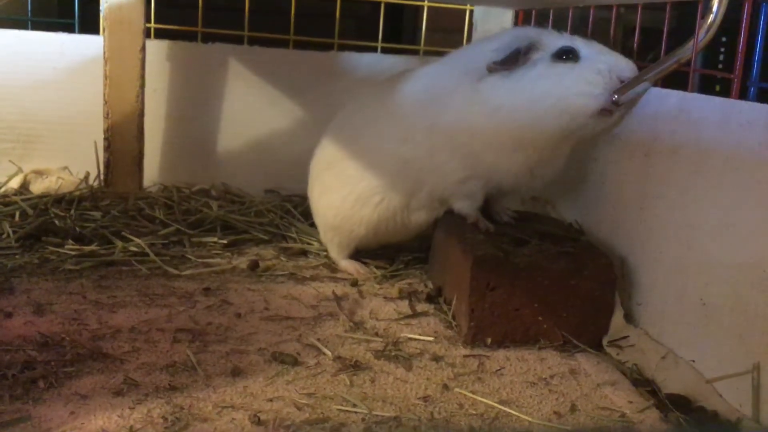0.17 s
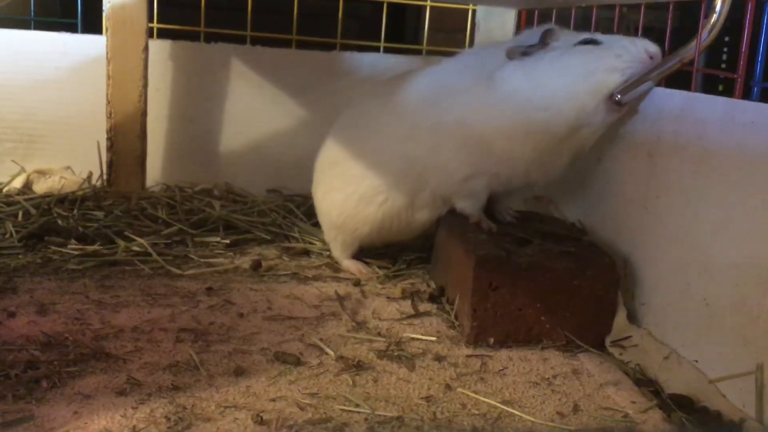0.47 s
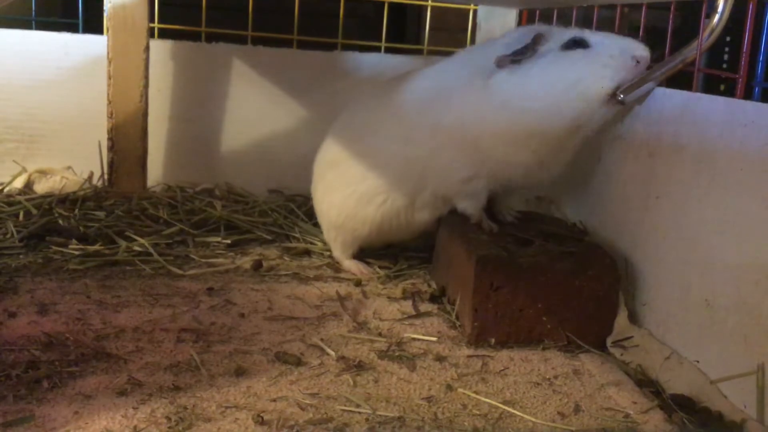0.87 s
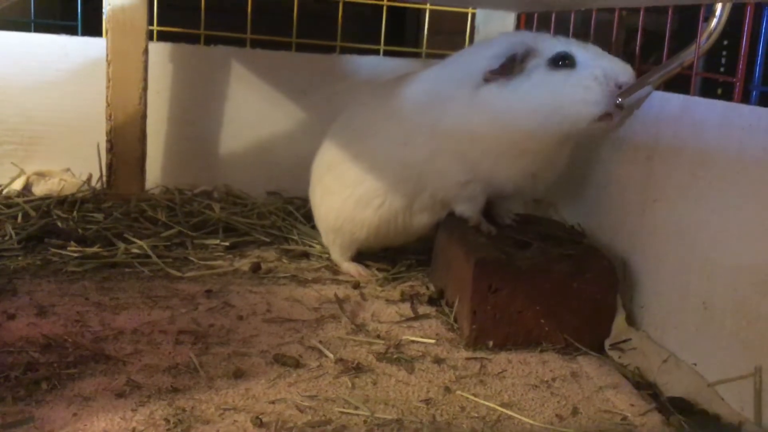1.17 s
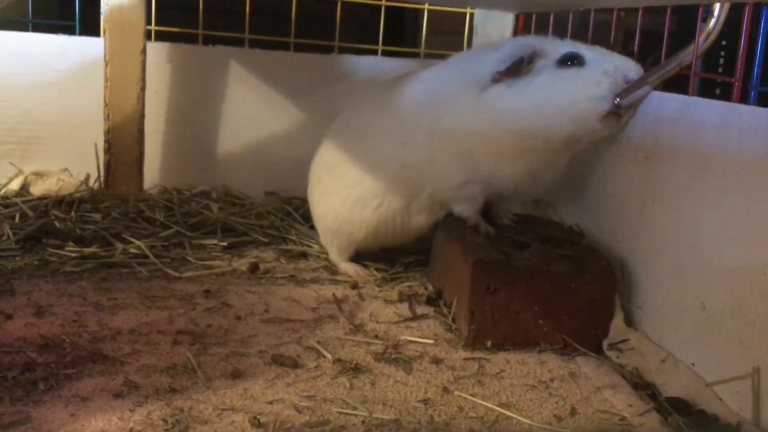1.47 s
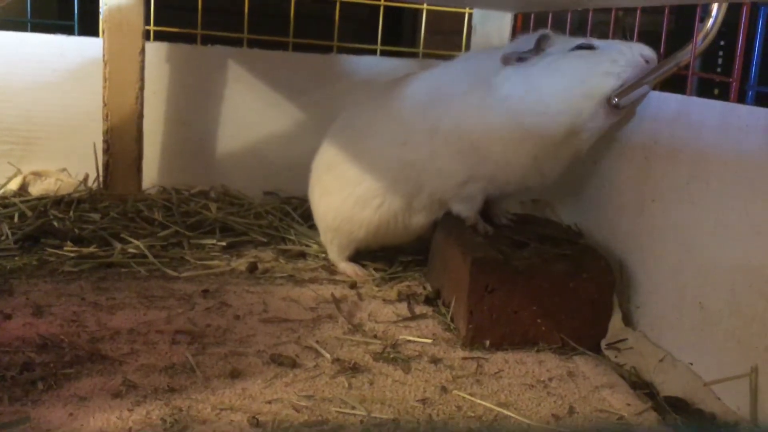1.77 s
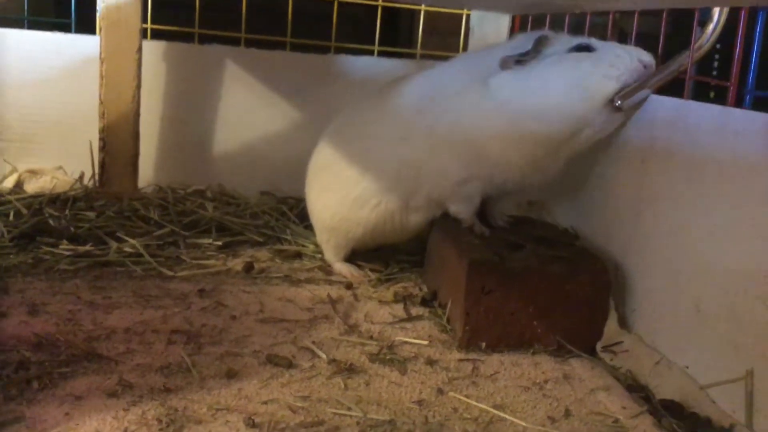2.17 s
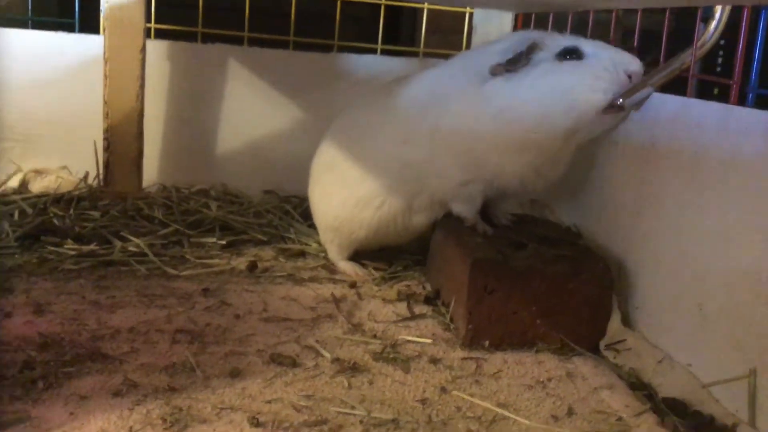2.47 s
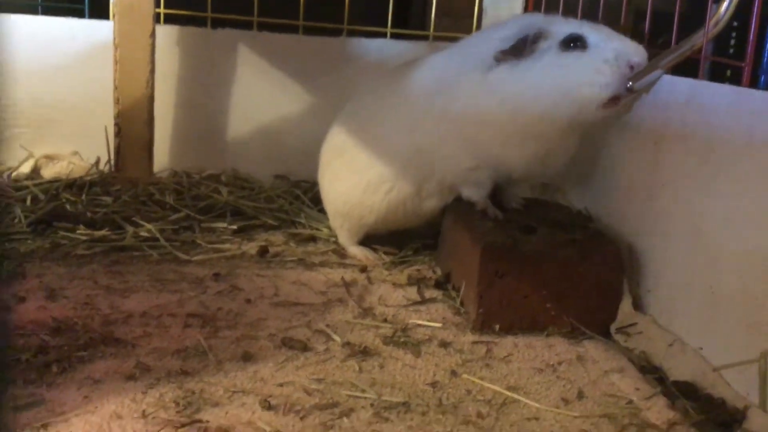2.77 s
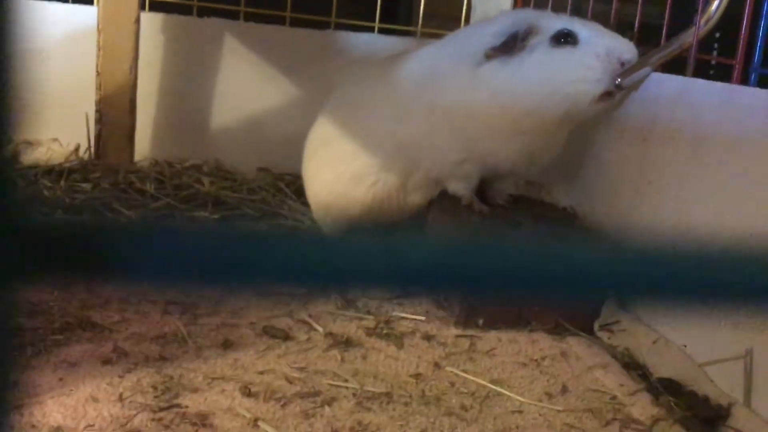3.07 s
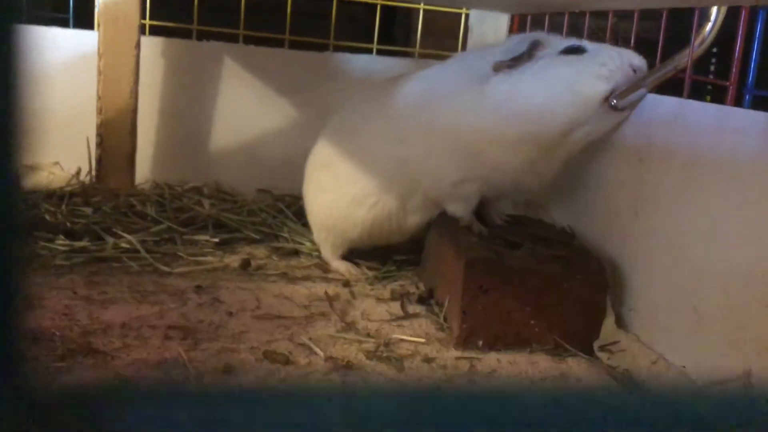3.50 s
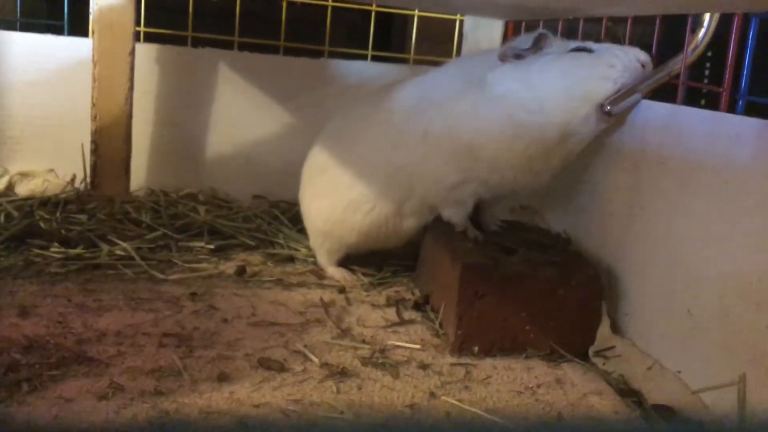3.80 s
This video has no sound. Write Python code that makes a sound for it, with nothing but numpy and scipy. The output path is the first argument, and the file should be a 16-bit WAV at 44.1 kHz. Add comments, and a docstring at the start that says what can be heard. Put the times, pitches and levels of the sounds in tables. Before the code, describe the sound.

A guinea pig drinks at a metal spout, with scattered clicks, soft thuds and a few rattling bumps over room hum and a thin sizzle. Late on, a knock close to the microphone rings the pen's panels and bars.

```python
"""A quiet room hums, with a thin high sizzle behind it, while a guinea pig drinks from a bottle.
The steel spout jolts twice, and again at the very end: each impact rattles it and bumps the bottle
against the pen. Between come small clicks, brief rustles and dull thuds as the animal shifts.
Late on, something knocks the pen near the microphone; its panels and wire bars ring in damped modes."""
import sys
import numpy as np
from scipy import signal
from scipy.fft import rfft, irfft, next_fast_len
from scipy.io import wavfile
from scipy.ndimage import map_coordinates

SR = 44100
rng = np.random.default_rng(int(sys.argv[2]) if len(sys.argv) > 2 else 0)


def store_pcm(level_fs):
    """Save levels as 16-bit WAV."""
    pcm = np.round(np.clip(level_fs, -1, 1) * 32767).astype(np.int16)
    wavfile.write(sys.argv[1], SR, np.atleast_2d(pcm).T)


N = 173754
TIME = np.arange(N) / SR
RING_TIME = TIME[:int(.7 * SR)]
KNOCK_S = 3.1775

# Room noise. Each row: frequency in Hz, relative spectral density in dB.
ROOM_SPECTRUM = [(20, -61), (30, -40), (38, -19), (52, 0.5), (90, 2.5), (150, -4.5), (200, -2.5),
                 (270, -9.5), (350, -11.5), (480, -18.5), (590, -13.5), (780, -15), (900, -22.5),
                 (1500, -26.5), (2000, -29.5), (2500, -35.5), (4000, -40.5), (7000, -51.5), (7850, -57),
                 (8200, -51), (8700, -52.5), (9600, -52), (10300, -55), (12000, -56), (15500, -53)]
# Slow swells of the room noise. Each row: time in seconds, rumble gain in dB, air gain in dB.
ROOM_SWELLS = [(0, -1, -0.5), (.5, -0.5, 1.1), (.86, 4, 1), (1.2, -3, 0), (1.6, 0, 0), (2.05, 4, 0.5),
               (2.55, -1, -1), (2.8, 3.5, -0.5), (3.1, 1, 0), (3.5, 0, -1), (3.94, 2, -0.5)]
# Motor hum. Each row: frequency in Hz, rms level in dB.
HUM_PARTIALS = [(58, -60.5), (118.6, -59.5), (236.6, -63), (295, -67.5), (529, -76), (647, -72), (969, -87),
                (1082, -85), (3181, -92), (9000, -105)]
# Resonances of the sizzle. Each row: centre in Hz, width in Hz, relative level in dB.
SIZZLE_RESONANCES = [(2280, 1000, -10.5), (3133, 620, -3), (5077, 430, -0.5), (5565, 990, -9.5)]
# Course of the sizzle. Each row: time in seconds, then hiss, high whistle and low whistle levels in dB.
SIZZLE_LEVELS = [(0, -74.5, -75.5, -87), (.5, -76, -85.5, -88), (.9, -74.5, -82.5, -85.5),
                 (1.25, -70.5, -80, -80), (1.5, -72, -86, -85), (1.7, -71.5, -83, -81),
                 (2.03, -70, -82, -83), (2.25, -72, -91, -88), (2.7, -71.5, -96, -95),
                 (2.95, -81.5, -100, -97), (3.35, -80, -100, -92), (3.65, -78.5, -98, -89),
                 (3.94, -80.5, -100, -93)]
# The lower whistles in the sizzle. Each entry: frequency in Hz.
LOW_WHISTLE_PITCHES = [4985, 5076]
# Rustles. Each row: centre and half length in seconds, level in dB, band centre and width in Hz.
RUSTLE_SWELLS = [(2.078, 0.013, -67, 2800, 3600), (2.793, 0.009, -67, 3870, 2000),
                 (2.786, 0.022, -82, 12000, 9050), (2.89, 0.12, -81, 6300, 1800),
                 (2.97, 0.024, -79, 10100, 10800), (2.971, 0.18, -77, 3880, 1210)]
# The animal shifting. Each row: start in seconds, level in dB.
FLOOR_BLOWS = [(0.844, -46), (1.634, -48.5), (2.102, -47), (2.775, -45.5), (2.853, -43)]
# The pen floor. Each row: frequency in Hz, relative level in dB, t60 in seconds.
FLOOR_MODES = [(62, 1, 0.14), (119, 5, 0.13), (171.4, -0.5, .1)]
# The knock and its rebounds. Each row: start in seconds, clatter level in dB.
KNOCK_CONTACTS = [(3.1775, -47), (3.187, -52), (3.202, -56.5), (3.223, -62)]
# Clatter of the knock. Each row: frequency in Hz, relative spectral density in dB, t60 in seconds.
CLATTER_SPECTRUM = [(100, -5, .38), (300, -3, 0.26), (600, -6.5, 0.25), (1090, -11, 0.22),
                    (2000, -20.5, .19), (2970, -24, 0.14), (3630, -17.5, 0.17), (5680, -23.5, 0.3),
                    (6460, -33, 0.13), (10000, -37, 0.17), (15500, -45, 0.15)]
# The pen's panels. Each row: frequency in Hz, relative level in dB, t60 in seconds.
PANEL_MODES = [(120.3, -0.5, 0.59), (166, 2.5, 0.48), (286, 1.5, 0.27), (322, -0.5, 0.23), (393, -8, 0.45),
               (533.7, -11, 0.51), (612, -3, 0.29), (646, -8, 0.33), (843, -6.5, 0.31), (1090, -25, 0.25),
               (1135, -19, 0.27), (1207, -20.5, 0.53), (1707, -15.5, 0.27), (2104, -27, 0.21),
               (2715, -23.5, 0.37)]
# The wire bars. Each row: frequency in Hz, level in dB, t60 and build-up time in seconds.
BAR_MODES = [(3513, -65, 0.36, .003), (3560, -68, 0.72, .003), (3670, -62, .6, 0.0087),
             (3770, -66.5, .3, .003), (4100, -72, .35, .003), (4242, -70, 0.42, .003),
             (4360, -75, 0.75, .003), (4540, -78, 0.61, .003), (4893, -73, 0.31, .003),
             (5351, -75, .4, .003), (5626, -63, .38, .08), (5680, -61, .38, .08), (5640, -56, .39, .1)]
# Clicks. Each row: start in seconds, peak in dB, band centre and width in Hz, t60 in seconds.
CLICK_BURSTS = [(.548, -62.5, 10000, 7500, 0.011), (.6975, -55.5, 1790, 800, .01),
                (.7035, -57, 5200, 700, .012), (.704, -70, 10000, 12000, .006),
                (0.7105, -57.5, 6000, 1000, 0.009), (0.7145, -59, 6300, 2500, 0.004),
                (.715, -70, 12000, 8000, 0.0064), (0.716, -67, 8300, 1000, 0.011),
                (2.075, -65, 9000, 12000, 0.0045), (2.076, -49, 5140, 900, 0.0076),
                (2.087, -56, 5300, 1200, .009), (2.462, -53.5, 3380, 1000, 0.0066),
                (2.592, -63.5, 7150, 4000, 0.0051), (2.652, -50.5, 3800, 2300, 0.0089),
                (2.668, -55, 4160, 2300, .008), (2.7616, -55, 3300, 3000, 0.0059),
                (2.7755, -56, 3800, 7000, 0.0018), (2.8555, -56, 4400, 3800, 0.007),
                (2.889, -67, 9000, 9000, .002), (2.9585, -66, 9000, 11000, .003),
                (2.9735, -62, 9000, 12000, .003), (3.003, -58, 3500, 3000, 0.0066),
                (3.1835, -60, 10000, 10000, .003), (3.196, -64, 10000, 10000, .003),
                (3.2333, -63.5, 11000, 7000, 0.0045), (3.779, -67, 8700, 1590, 0.0065)]
# Sharp snaps. Each row: start in seconds, level in dB.
SNAP_ONSETS = [(2.729, -33.5), (3.1774, -45)]
# Modes of a snap. Each row: frequency in Hz, relative level in dB, t60 in seconds.
SNAP_RESONANCES = [(1050, -5.5, 0.0035), (1840, -4, 0.0024), (2790, -0.5, 0.0037), (4320, -6.5, 0.0028),
                   (7900, -20, 0.00067)]
# Jolts of the bottle. Each row: start in seconds, thump and rattle levels in dB, rattle t60 in seconds.
BOTTLE_JOLTS = [(.696, -42, -60, 0.12), (.712, -47.5, -62.5, 0.18), (2.0745, -45, -55, .06),
                (2.086, -39.5, -59, 0.15), (3.925, -48, -66.5, .15)]
# Bottle and pen wall together. Each row: frequency in Hz, relative level in dB, t60 in seconds.
BOTTLE_MODES = [(129.7, -4, 0.38), (233.1, 4.5, 0.22), (272, -9, 0.042), (327, -4.5, 0.065),
                (529, -17.5, 0.32), (568, -20, 0.18), (767, -20.5, 0.57), (3806, -38, 0.3)]
# Rattle of the spout. Each row: frequency in Hz, relative spectral density in dB.
SPOUT_SPECTRUM = [(400, -16), (700, -6), (1000, -1), (1400, 3.5), (1750, 10), (2500, -3), (3550, -2.5),
                  (3820, -20), (4250, -7), (5170, 5.5), (5700, -4.5), (7000, -13), (9000, -13),
                  (11000, -37), (15500, -18)]


def amp(db):
    """Amplitude ratio of a level in decibels."""
    return 10 ** (np.asarray(db) / 20)


def unit(x):
    """Normalisation to rms 1."""
    return x / np.sqrt(np.mean(x ** 2) + 1e-20)


def along(points, hz):
    """Interpolation of (Hz, value) points on a log frequency axis."""
    f, values = np.transpose(points)
    return np.interp(np.log(hz + 1), np.log(f + 1), values)


def curves(rows):
    """Linear interpolation in time of each column after the first."""
    times, *columns = np.transpose(rows)
    return [np.interp(TIME, times, column) for column in columns]


def wobble(rate):
    """Smooth random modulation with rate knots a second."""
    return map_coordinates(rng.standard_normal(int(N * rate / SR) + 4), [TIME * rate])


def filtered(x, response):
    """Linear filtering: the spectrum of x times a frequency response."""
    size = next_fast_len(len(x) + 8192)
    return irfft(rfft(x, size) * response(np.fft.rfftfreq(size, 1 / SR)), size)[:len(x)]


def resonance(f, hz, width_hz):
    """Gain of two equal resonators in cascade."""
    return (f * width_hz) ** 2 / ((hz * hz - f * f) ** 2 + (f * width_hz) ** 2)


def passband(f, hz, width_hz):
    """Gain of a flat-topped band-pass filter."""
    return 1 / (1 + ((f * f - hz * hz) / (f * width_hz + 1)) ** 4)


def noise(response, size=N):
    """White noise coloured by a filter, at rms 1."""
    return unit(filtered(rng.standard_normal(size), response))


def fade(t, t60):
    """Exponential damping: 60 dB down after t60 seconds."""
    return np.exp(-np.log(1000) * t / t60)


def rise(t, attack_s):
    """Exponential approach to full amplitude."""
    return 1 - np.exp(-t / attack_s)


def ring(modes, attack_s):
    """Free vibration after a blow: a sum of damped sinusoids."""
    t = RING_TIME
    tones = sum(amp(db) * fade(t, t60) * np.sin(2 * np.pi * hz * t) for hz, db, t60 in modes)
    return tones * rise(t, attack_s)


def add(track, start_s, sound):
    """Superposition of a sound on the track."""
    part = track[round(start_s * SR):][:len(sound)]
    part += sound[:len(part)]


def wavering_tone(hz, waver_db, waver_rate, drift_rad, drift_rate):
    """Random amplitude and phase modulation of a sinusoid, at about rms 1."""
    gain = amp(waver_db * wobble(waver_rate))
    return gain * np.sqrt(2) * np.sin(2 * np.pi * hz * TIME + drift_rad * wobble(drift_rate))


def room():
    """Broadband air noise and rumble swell slowly under the line spectrum of a motor."""
    air = amp(-52) * noise(lambda f: amp(along(ROOM_SPECTRUM, f)))
    rumble = filtered(air, lambda f: 1 / (1 + (f / 141) ** 4))  # below 141 Hz
    rumble_db, air_db = curves(ROOM_SWELLS)
    hum = sum(amp(db) * wavering_tone(hz, waver_db=2.5, waver_rate=3.906, drift_rad=.66, drift_rate=5.004)
              for hz, db in HUM_PARTIALS)
    return amp(air_db) * (air - rumble) + amp(rumble_db) * rumble + hum


def whistle(hz):
    """Modulation spreads a pure tone into a thin, unsteady whistle."""
    return wavering_tone(hz, waver_db=2.8, waver_rate=12, drift_rad=1.3, drift_rate=40)


def sizzle():
    """Resonances colour a faint, fluttering hiss, in which whistles come and go."""
    hiss_db, high_db, low_db = curves(SIZZLE_LEVELS)
    hiss = noise(lambda f: sum(amp(db) * resonance(f, hz, width) for hz, width, db in SIZZLE_RESONANCES))
    high = amp(high_db) * whistle(hz=5179)
    low = amp(low_db) * sum(whistle(hz) for hz in LOW_WHISTLE_PITCHES)
    flutter_db = .9 * wobble(60)
    return amp(hiss_db + flutter_db) * hiss + high + low


def rustles():
    """Fast amplitude modulation makes band noise grainy; a Gaussian envelope swells and fades it."""
    out = np.zeros(N)
    for centre_s, half_s, db, hz, width in RUSTLE_SWELLS:
        hiss = noise(lambda f: passband(f, hz, width))
        grain_db = 3.5 * wobble(600)
        out += amp(db) * unit(hiss * amp(grain_db)) * np.exp(-((TIME - centre_s) / half_s) ** 2)
    return out


def thuds():
    """Soft impacts of the shifting animal excite the low modes of the floor."""
    out = np.zeros(N)
    for start_s, db in FLOOR_BLOWS:
        add(out, start_s, amp(db) * ring(FLOOR_MODES, attack_s=.0018))
    return out


def knock():
    """An impact excites the panel modes and a rebounding clatter whose damping depends on frequency."""
    out, rows = np.zeros(N), np.array(CLATTER_SPECTRUM)
    spectrum, decay_times = rows[:, :2], rows[:, ::2]
    for start_s, db in KNOCK_CONTACTS:
        burst = noise(lambda f: amp(along(spectrum, f)), size=len(RING_TIME))
        hz, t, bands = signal.stft(burst, SR, nperseg=256)
        _, clatter = signal.istft(bands * fade(t, along(decay_times, hz)[:, None]), SR)
        add(out, start_s, amp(db) * clatter)
    add(out, KNOCK_S, amp(-43) * ring(PANEL_MODES, attack_s=.00072))
    return out


def bars():
    """The knocked wire bars ring roughly; close modes beat, and the highest build up slowly."""
    out, t = np.zeros(N), RING_TIME
    for hz, db, t60, attack_s in BAR_MODES:
        jitter_rad = .55 * wobble(120)[:len(t)]
        flutter_db = 2 * wobble(90)[:len(t)]
        tone = amp(db + flutter_db) * np.sin(2 * np.pi * hz * t + jitter_rad)
        add(out, KNOCK_S, tone * fade(t, t60) * rise(t, attack_s))
    return out


def clicks():
    """Transients of mouth, spout and hay: bursts of band noise, and snaps of heavily damped modes."""
    out, t = np.zeros(N), RING_TIME[:SR // 20]
    for start_s, db, hz, width, t60 in CLICK_BURSTS:
        burst = noise(lambda f: passband(f, hz, width), size=len(t)) * t * fade(t, t60)
        add(out, start_s, amp(db) * burst / np.abs(burst).max())
    for start_s, db in SNAP_ONSETS:
        add(out, start_s, -amp(db) * ring(SNAP_RESONANCES, attack_s=.00007))
    return out


def bottle(attack_s=.0012):
    """Each impact excites the modes of bottle and wall, and the steel spout rattles as damped noise."""
    out, t = np.zeros(N), RING_TIME
    thump = ring(BOTTLE_MODES, attack_s)
    for start_s, thump_db, rattle_db, t60 in BOTTLE_JOLTS:
        burst = noise(lambda f: amp(along(SPOUT_SPECTRUM, f)), size=len(t))
        rattle = burst * fade(t, t60) * rise(t, attack_s)
        add(out, start_s, amp(thump_db) * thump + amp(rattle_db) * rattle)
    return out


def scene():
    """Superposition of all sources at one microphone."""
    return (room() + sizzle() + bottle() + thuds() + knock() + bars() + clicks() + rustles())[None]


def record(dry):
    """Band limiting removes the deepest bass and the highest treble."""
    low_cut_hz, top_hz = 33, 15800
    return filtered(dry[0], lambda f: (f < top_hz) * f ** 6 / (f ** 6 + low_cut_hz ** 6))[None]


dry = scene()
out = record(dry)
store_pcm(out)
```